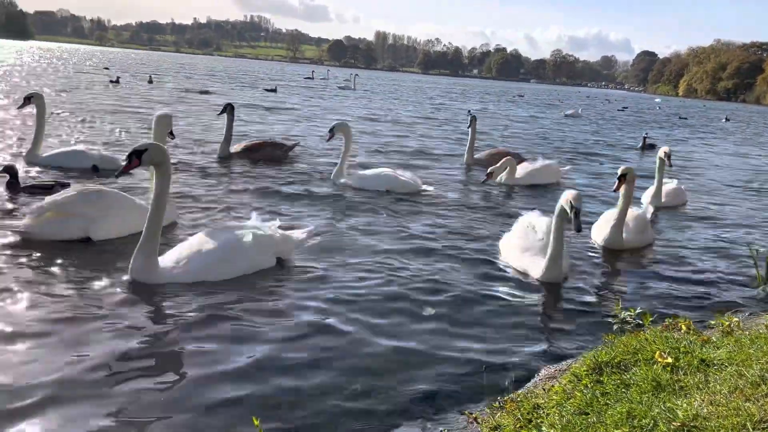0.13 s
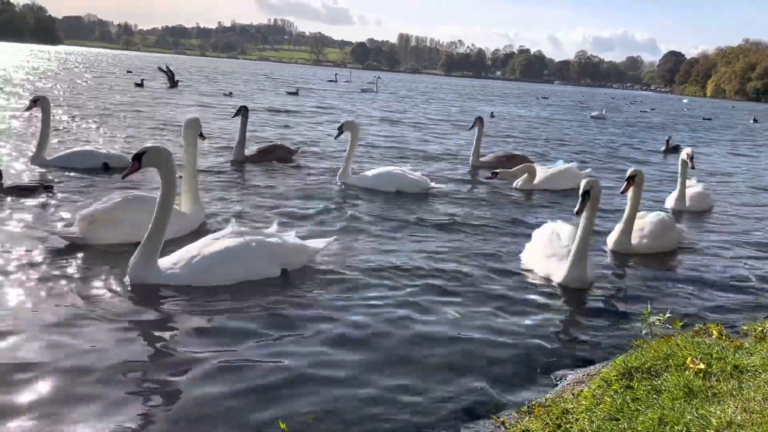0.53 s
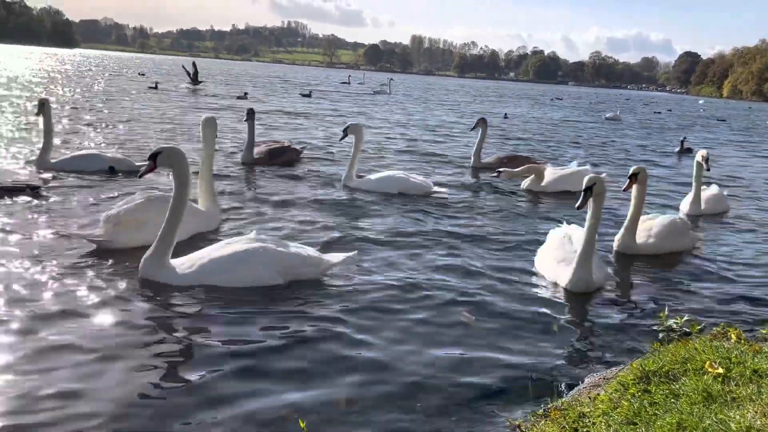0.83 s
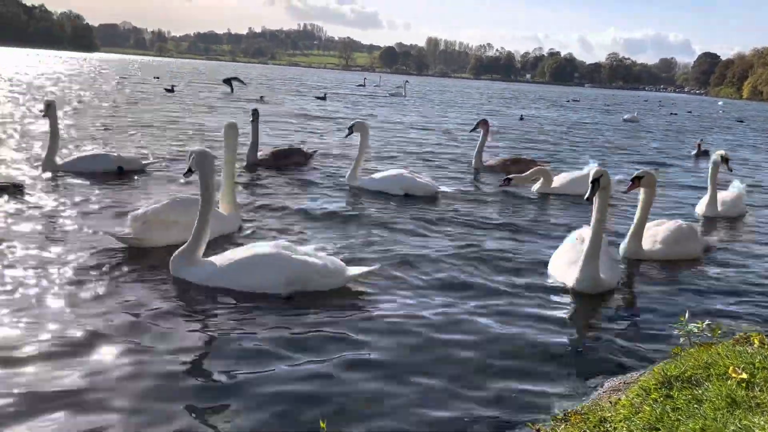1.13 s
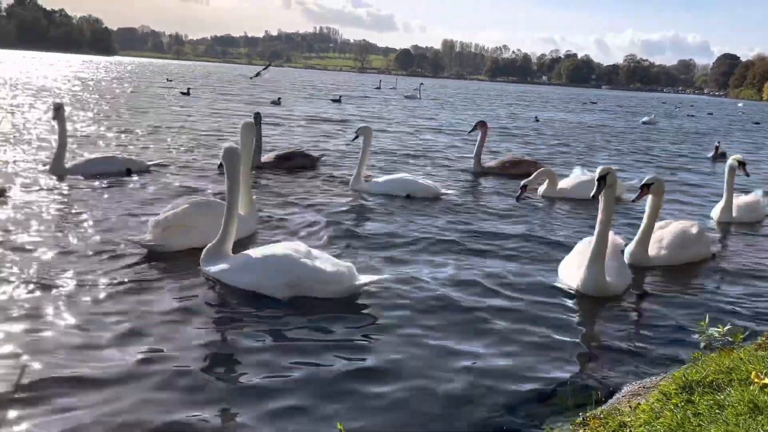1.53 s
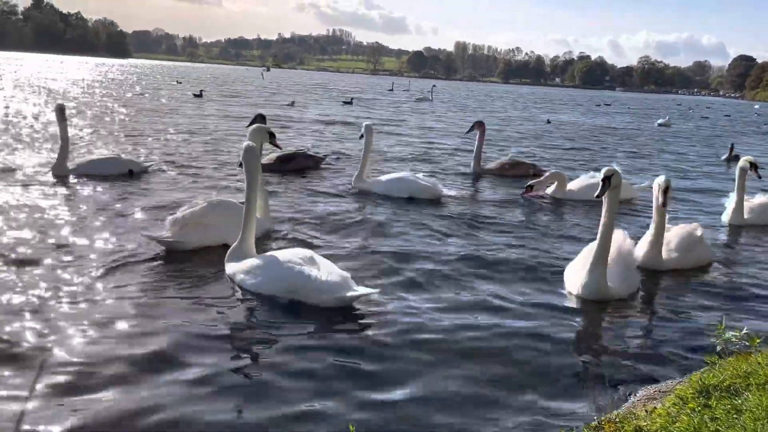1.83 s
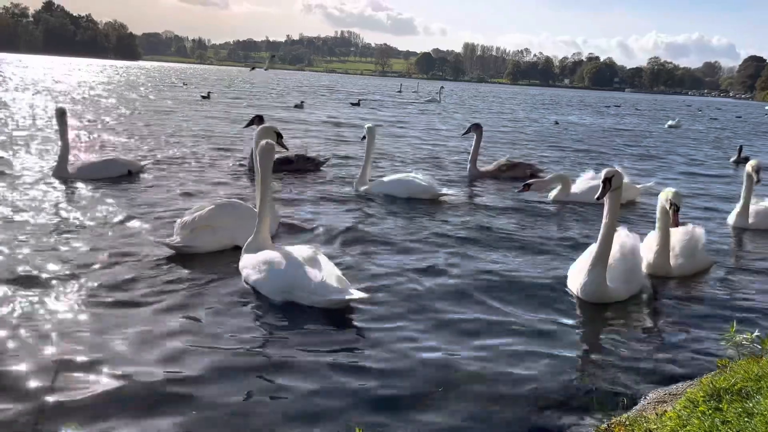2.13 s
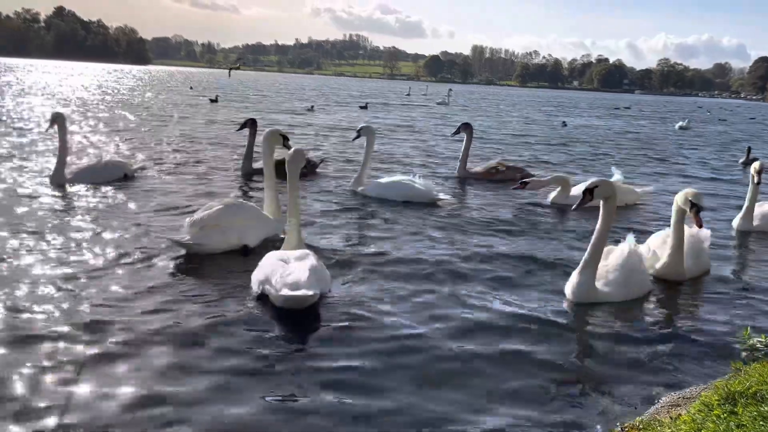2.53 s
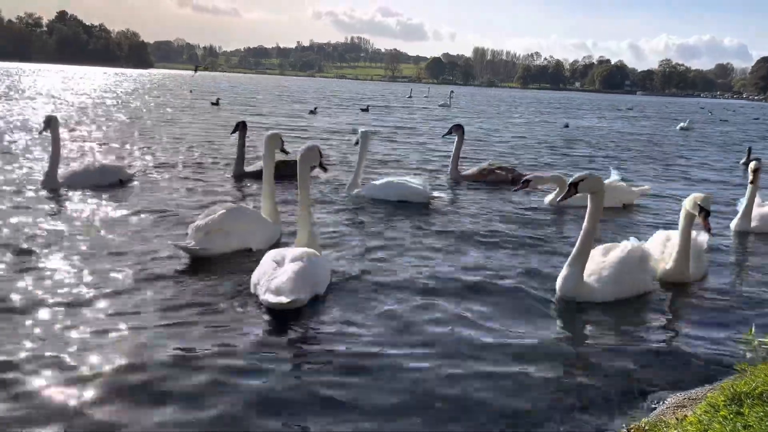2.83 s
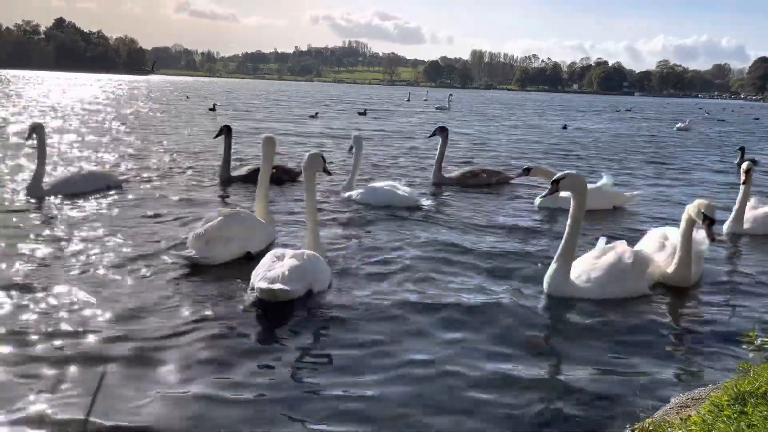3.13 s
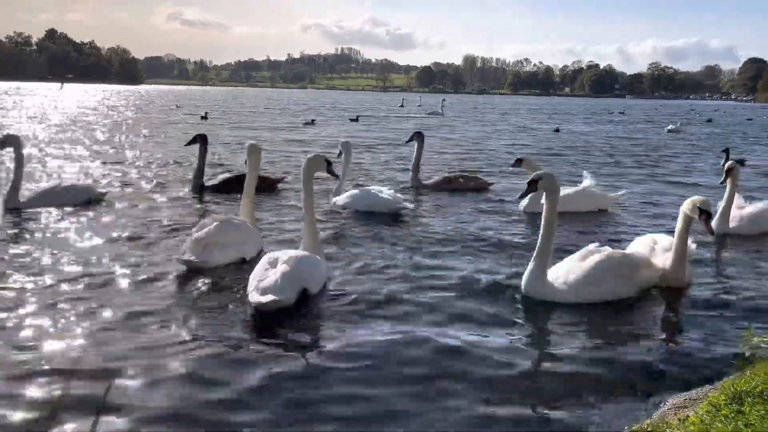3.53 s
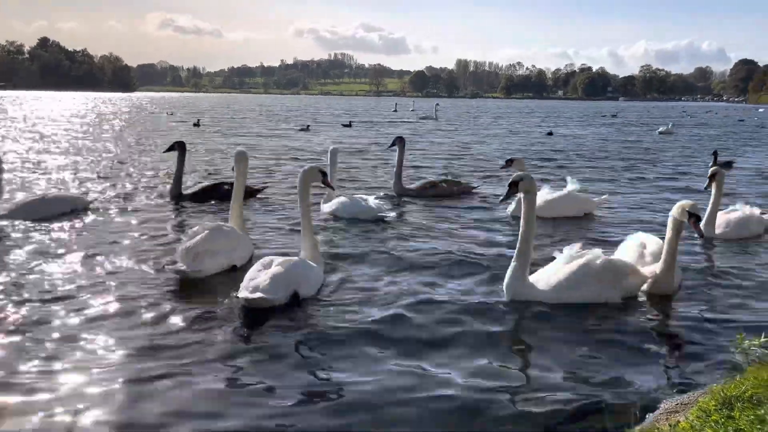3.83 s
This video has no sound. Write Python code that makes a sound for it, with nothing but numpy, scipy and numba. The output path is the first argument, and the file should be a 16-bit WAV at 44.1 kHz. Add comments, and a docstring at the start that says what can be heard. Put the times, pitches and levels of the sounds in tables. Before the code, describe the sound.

Gusty wind rumbles and thumps on the microphone over soft lake water as swans grunt briefly.

```python
"""Windy lake shore with swans

Gusts buffet the two microphone ports of a phone as rumble, flutter, crackle and single thumps of noise
and sine. The water hisses softly in flickering noise bands. Droplets tick as tiny bright grains and
bubbles plip as short tones, mostly gliding. Three swans, one near and two fainter, give creaky grunts:
slow pulses ring resonances of throat, beak and chest.
"""
import sys
import numpy as np
from scipy import signal
from scipy.fft import rfft, irfft
from scipy.io import wavfile
from scipy.ndimage import uniform_filter1d
from numba import njit

SR = 44100
rng = np.random.default_rng(int(sys.argv[2]) if len(sys.argv) > 2 else 0)


def wrap_up_sound(samples):
    """Save the sound to the file named by the first command line argument, as 16-bit audio."""
    columns = np.atleast_2d(samples).T
    # keep every value between -1 and 1, then stretch to whole-number steps
    tamed = np.clip(columns, -1, 1)
    steps = np.round(tamed * 32767).astype(np.int16)
    wavfile.write(sys.argv[1], SR, steps)


N = 176400
T = np.arange(N) / SR  # s
HZ = np.maximum(np.fft.rfftfreq(N, 1 / SR), 1)

# How the two ports hear one sound:
# (frequency [Hz], shared share of power [0-1], lead of the right [rad], left above right [dB])
PORT_PAIR = [(100, 0.2, 0.35, 0.4), (407, 1, 0.94, -0.1), (950, 0.31, 1.74, 0.5), (1545, 0.73, 3.02, -3.5),
             (1893, 0.66, 6.3, 3), (2380, 0.46, 6.5, -0.5), (3740, 0.14, 6.3, 2.5), (5000, 0.27, 8.1, 6.5),
             (6670, 0, 6.8, 4.5), (7130, 0.94, 8.2, -3.5), (8750, 1, 10.02, 2.5), (11420, 1, 11.97, -2),
             (13450, .99, 18, 1.5), (14800, 0.8, 15.7, -1)]

# Colour of the water's wash: (frequency [Hz], relative level [dB per Hz])
LAKE_COLOUR = [(25, -23), (50, -21), (150, -4.5), (350, -4.5), (600, -5.5), (800, -1.5), (1000, 1),
               (1300, -5.5), (1600, -6.5), (1800, -12.5), (2600, -15), (3850, -20), (5200, -21),
               (6500, -28.5), (9500, -32.5), (13000, -34.5), (15600, -46)]
LAKE_DB = -47
LAKE_FLICKER_DB, TREBLE_FLICKER_DB = 1.34, 1  # spread at 4 kHz and at 12 kHz

# Course of the gusts: (time [s], rumble level [dB], flutter above rumble [dB])
GUST_COURSE = [(0.0, -43, -4.5), (0.08, -35, -1.5), (0.18, -43.5, 1.5), (0.24, -29, -2),
               (0.38, -37.5, -12.5), (0.42, -40, -2.5), (0.56, -36, -9.5), (0.7, -55, 2),
               (0.76, -37.5, -1.5), (0.9, -41, -6.5), (1.09, -30, -11), (1.11, -41, -4), (1.2, -26, 3),
               (1.29, -34, -21), (1.32, -57, -3), (1.43, -26.5, -12), (1.49, -55, 6), (1.6, -36.5, -9),
               (1.63, -56.5, 3), (1.8, -38, -5), (2.36, -44, -2.5), (2.52, -32.5, -1), (2.71, -43.5, -11.5),
               (2.79, -54.5, 2), (2.85, -40.5, -5.5), (3.05, -45.5, 0), (3.08, -35, -6.5),
               (3.17, -33.5, -2.5), (3.22, -40, -6.5), (3.264, -26.5, -0.5), (3.33, -35.5, -2),
               (3.518, -34, -5), (3.646, -27, 4.5), (3.685, -28.5, -8.5), (3.72, -25.5, -1),
               (3.794, -27.5, 0), (3.832, -21, -3.5), (3.86, -29, -25), (3.892, -37.5, -8.5),
               (4.0, -32.5, -3.5)]
# Colours of the three wind layers: (frequency [Hz], relative level [dB per Hz])
RUMBLE_COLOUR = [(25, -21), (45, 10.5), (65, 14), (110, 12), (170, -2), (300, -56), (600, -94)]
FLUTTER_COLOUR = [(50, -23), (90, -7.5), (170, 1.5), (300, -4.5), (450, -12), (650, -20.5), (1000, -57),
                  (2000, -100)]
CRACKLE_COLOUR = [(250, -41), (400, 5), (550, -2), (750, -14.5), (1100, -16), (2000, -77)]
RUMBLE_ROUGH_DB, FLUTTER_ROUGH_DB, CRACKLE_ROUGH_DB = 2.0, 2.6, 3
CRACKLE_DB, CRACKLE_GROWTH = -14.5, 0.48  # above a gust of -31.5 dB; extra dB per dB of gust
CRACKLE_FOLLOWS = 0.45  # share of the flutter's dB above the rumble
WIND_ALIKE = 0.87  # share of wind power common to both ports

# Sharp single buffets, before the ports: (time [s], envelope peak level [dB])
THUMP_HITS = [(0.215, -17), (0.269, -21), (0.333, -34), (0.483, -27.5), (0.52, -20.5), (0.741, -29),
              (0.969, -26), (1.033, -28.5), (1.189, -14.5), (1.872, -27), (2.435, -23), (2.479, -23),
              (2.525, -15.5), (2.858, -28.5), (3.016, -30), (3.067, -27.5), (3.16, -19.5), (3.248, -21.5),
              (3.367, -16), (3.456, -27.5), (3.573, -18.5), (3.619, -12.5), (3.634, -5), (3.701, -18),
              (3.785, -20), (3.82, -15.5)]
THUMP_HZ, THUMP_CYCLES = 227.3, 1.45  # pitch at mid-thump; length scale
THUMP_SAG = 0.4  # share of the mid-thump pitch lost per cycle of it

# Clear droplets: (time [s], envelope peak level [dB])
CLEAR_TICKS = [(0.778, -43), (0.8869, -36), (0.9592, -45), (2.265, -42), (2.289, -39), (2.2914, -49),
               (2.3003, -37), (2.3042, -32.5), (3.5404, -37.5), (3.809, -50), (3.8671, -47), (3.911, -47),
               (3.9497, -43)]
TICK_HZ, TICK_SPREAD_HZ, TICK_CYCLES = 11200, 900, 1.1  # cycles up to the envelope peak
SPRAY_PER_S, SPRAY_DB, SPRAY_SPREAD_DB = 70, -64, 2  # quietest level; mean excess over it
SPRAY_LOW_HZ, SPRAY_HIGH_HZ, SPRAY_CYCLES = 6100, 14100, 3.4

# Bubble tones:
# (time [s], level [dB], start pitch [Hz], end over start pitch [ratio], length [ms], left above right [dB])
BUBBLE_TONES = [(.661, -49, 1500, 1.6, 16, -4), (0.692, -44, 2500, 0.97, 9.8, -4.5),
                (0.7262, -45.5, 2800, 0.95, 6.5, -16), (0.7255, -50, 2100, 1.2, 10, -6),
                (1.458, -47, 3880, 1.4, 14, 4), (1.62, -53, 878, 1, 65, 7),
                (2.305, -44.5, 2650, 1.36, 7.9, 1), (2.935, -57, 2170, 1.06, 70, 0),
                (2.66, -53.5, 2260, 0.72, 105, -5.5), (2.7179, -46, 2300, 1.15, 13, 0),
                (3.533, -46.5, 995, 1, 34, 22), (3.556, -45.5, 1146, 1.45, 18, 2),
                (3.645, -53, 3660, .93, 8, 7), (3.659, -53, 4500, 0.96, 6.2, -4),
                (3.743, -62, 3150, 0.77, 4.7, 3), (3.775, -51, 4120, 1, 8, 5),
                (3.797, -48.5, 2400, 0.96, 24, -1), (3.925, -52.5, 3080, 0.99, 8, 9.5)]

# Each swan's voice over its grunt, one table per swan:
# (time [s], level [dB], first throat resonance [Hz], second throat resonance [Hz],
#  second above first [dB], beak resonance [Hz], beak above first throat [dB])
GRUNT_VOICES = [
    [(1.3843, -38, 1035, 1885, -6, 2300, -1), (1.42, -23, 1180, 1570, -4.5, 1890, -7),
     (1.44, -26, 1160, 1490, 3, 1880, -5), (1.46, -25, 1200, 1570, 8, 2000, -6),
     (1.478, -25, 1190, 1560, 7, 2550, -7), (1.495, -27, 1220, 1560, 7, 2900, -7),
     (1.515, -26.5, 1260, 1540, -13, 2620, -5), (1.54, -37, 990, 1680, -7, 2400, -3)],
    [(2.4358, -48, 2450, 4900, -15, 1300, -10), (2.495, -35.5, 2640, 4900, -13, 1290, -8),
     (2.515, -39, 2520, 4970, -19, 1300, -6), (2.535, -29.5, 2620, 5100, -17, 1280, -8),
     (2.585, -27.5, 3040, 6100, -20, 1480, -8), (2.64, -35.5, 2980, 6040, -14, 1290, -3)],
    [(3.378, -63, 2800, 2220, -5, 4000, -19), (3.43, -42, 2850, 2250, 2, 4000, -14),
     (3.468, -45, 2850, 1900, 0, 4000, -14), (3.501, -36, 2950, 2190, -7, 4000, -8),
     (3.565, -39, 3040, 2350, -3, 3950, -13)],
]
# Pulse rate over each grunt, one table per swan: (time [s], rate [pulses per s])
GRUNT_RATES = [
    [(1.385, 50), (1.432, 57.3), (1.478, 55.5), (1.54, 43)],
    [(2.4352, 50), (2.525, 52), (2.6, 63), (2.64, 62.5)],
    [(3.378, 52.5), (3.565, 68)],
]
# Build and place of each swan: (left above right [dB], right late [ms], throat width [Hz],
#  width of two further filter passes [multiple], chest above first throat [dB], rise in a pulse [0-1])
SWAN_BODIES = [(-.5, .1, 185, 5.5, -16, .03), (0, 0.034, 430, 1.5, -16, 0.25),
               (4.5, 0.062, 450, 1.6, -21, 0.2)]
GRUNT_JITTER, GRUNT_SCATTER_DB, GRUNT_RASP = 0.002, 0.8, 0.04  # rate share; per pulse; re pulse of 1
BEAK_WIDTH_HZ, CHEST_HZ, CHEST_WIDTH_HZ = 550, 386, 150
ECHO_S, ECHO_DB = 0.16, -12  # time to fall 60 dB; energy gain of the tail

TOP_HZ = 15700


def undb(db):
    """Turn decibels into an amplitude factor."""
    return 10 ** (np.asarray(db) / 20)


def level(x, db):
    """Set the RMS level of a sound."""
    return x * undb(db) / np.sqrt(np.mean(x ** 2))


def over_hz(table):
    """Read a table's columns at every frequency, on a log frequency axis."""
    rows = np.array(table).T
    return [np.interp(np.log(HZ), np.log(rows[0]), column) for column in rows[1:]]


def over_time(table):
    """Read a table's columns at every sample."""
    rows = np.array(table).T
    return [np.interp(T, rows[0], column) for column in rows[1:]]


def walk(rate):
    """Wander randomly: levels held for 1 / rate s and smoothed twice, with a spread near 1."""
    hold = int(SR / rate)
    steps = np.repeat(rng.standard_normal(N // hold + 1), hold)
    return 1.74 * uniform_filter1d(uniform_filter1d(steps, hold), hold)[:N]


def noises(gain):
    """Make three unrelated noises of one colour."""
    return irfft(rfft(rng.standard_normal((3, N))) * gain, N)


@njit
def resonator(x, hz, width):
    """State-variable band-pass with a moving centre, gain 1 at the centre."""
    y, band, low = np.empty(len(x)), 0., 0.
    for i in range(len(x)):
        g, damping = np.tan(np.pi * hz[i] / SR), width / hz[i]
        v = (band + g * (x[i] + 1e-18 - low)) / (1 + g * (g + damping))
        band, low, y[i] = 2 * v - band, low + 2 * g * v, damping * v
    return y


def ports(shared, own=0, alike=None):
    """Bring a sound to both ports with a phase and level difference, plus a part of each port's own."""
    table_alike, lead, db = over_hz(PORT_PAIR)
    alike = np.clip(table_alike if alike is None else alike, 0, 1)
    side = np.array([[1], [-1]])  # left, right
    common = np.sqrt(alike) * rfft(shared) * np.exp(-.5j * lead * side)
    separate = np.sqrt(1 - alike) * rfft(own + np.zeros((2, N)))
    return irfft((common + separate) * undb(db * side / 2), N)


def place(x, pan_db, late_ms):
    """Pan by level, with the right channel a little late."""
    left = x * undb(pan_db / 2)
    right = np.interp(T - late_ms / 1000, T, x) * undb(-pan_db / 2)
    return np.array([left, right])


def lake():
    """Wash of small waves: overlapping noise bands, each flickering in level on its own."""
    colour, wash = undb(over_hz(LAKE_COLOUR)[0]), 0
    for centre in np.arange(5, 14.5, .5):  # log2 of Hz: half-octave steps
        band = np.cos(np.pi * np.clip(np.log2(HZ) - centre, -.5, .5))
        flicker_db = np.interp(centre, np.log2([4000, 12000]), [LAKE_FLICKER_DB, TREBLE_FLICKER_DB])
        wash = wash + noises(colour * band) * undb(flicker_db * walk(21.99))
    wash = level(wash, LAKE_DB)
    return ports(wash[0], wash[1:])


def wind_layer(colour, db):
    """Coloured noise whose level follows a moving curve."""
    return level(noises(undb(over_hz(colour)[0])), 0) * undb(db)


def thumps():
    """Sharp buffets: a brief sine of sagging pitch under a bell-shaped envelope."""
    out = np.zeros(N)
    for start, db in THUMP_HITS:
        turn = (T - start) * THUMP_HZ - THUMP_CYCLES / 2  # cycles from mid-thump
        envelope = np.exp(-(2.55 * turn / THUMP_CYCLES) ** 2)
        out += undb(db) * envelope * np.sin(2 * np.pi * (turn - THUMP_SAG * turn ** 2 / 2))
    return out


def wind():
    """Eddies press on the ports: deep rumble, rougher flutter, crackle growing with the gusts, thumps."""
    rumble_db, above_db = over_time(GUST_COURSE)
    flutter_db = rumble_db + above_db + FLUTTER_ROUGH_DB * walk(80)
    gust_db = rumble_db + CRACKLE_FOLLOWS * (flutter_db - rumble_db)
    crackle_db = gust_db + CRACKLE_DB + CRACKLE_GROWTH * (gust_db + 31.5) + CRACKLE_ROUGH_DB * walk(110)
    air = wind_layer(RUMBLE_COLOUR, rumble_db + RUMBLE_ROUGH_DB * walk(25.61))
    air += wind_layer(FLUTTER_COLOUR, flutter_db)
    air += wind_layer(CRACKLE_COLOUR, crackle_db)
    air[0] += thumps()  # row 0 reaches both ports
    return ports(air[0], air[1:], WIND_ALIKE)


def ticks():
    """Droplets land as tiny bright sine grains, a few clear ones among a fine spray of scattered pitch."""
    clear = np.array(CLEAR_TICKS)
    clear_hz = TICK_HZ + TICK_SPREAD_HZ * rng.standard_normal(len(clear))
    clear = np.c_[clear, clear_hz, np.full(len(clear), TICK_CYCLES)]

    chance = rng.random((int(SPRAY_PER_S * N / SR), 3))
    spray_s = chance[:, 0] * N / SR
    spray_db = SPRAY_DB - SPRAY_SPREAD_DB * np.log(chance[:, 1])
    spray_hz = SPRAY_LOW_HZ + (SPRAY_HIGH_HZ - SPRAY_LOW_HZ) * chance[:, 2]
    spray = np.c_[spray_s, spray_db, spray_hz, np.full(len(chance), SPRAY_CYCLES)]

    out, t = np.zeros(N + 256), T[:256]
    for start, db, hz, cycles in np.r_[clear, spray]:
        u = t * hz / cycles
        envelope = np.e * u * np.exp(-u)  # peaks at 1 when u = 1
        first = int(start * SR)
        out[first:first + 256] += undb(db) * envelope * np.sin(2 * np.pi * hz * t)
    return ports(out[:N], alike=1)


def bubbles():
    """Each bubble rings as a short tone, steady or gliding, that swells fast and fades slower."""
    out = np.zeros((2, N))
    for start, db, hz, glide, ms, pan_db in BUBBLE_TONES:
        u = np.clip((T - start) * 1000 / ms, 0, 1)  # progress through the bubble
        tone = np.sin(2 * np.pi * hz * ms / 1000 * (u + (glide - 1) * u ** 2 / 2))
        envelope = np.sin(np.pi * u ** 0.37) ** 2
        out += place(undb(db) * tone * envelope, pan_db, 0.016)
    return out


def echo(voice):
    """A fading noise tail, different left and right, smears the voice."""
    tail = rng.standard_normal((2, SR // 4)) * undb(-60 * T[:SR // 4] / ECHO_S)
    tail = level(tail, ECHO_DB) * np.sqrt(4 / SR)  # from RMS to total energy
    return signal.fftconvolve(voice[None], tail, axes=1)[:, :N]


def grunt(table, rates, swan):
    """Slow pulses with a short rasp ring two moving throat resonances, the beak and the chest."""
    pan_db, late_ms, width_hz, soften, chest_db, rise = swan
    db, first_hz, second_hz, second_db, beak_hz, beak_db = over_time(table)
    on = (T >= rates[0][0]) & (T < rates[-1][0])
    rate = over_time(rates)[0] * on * (1 + GRUNT_JITTER * walk(50))
    phase = np.cumsum(rate) / SR + on  # whole numbers mark pulses; the first comes at once
    within = phase % 1

    pulses = np.maximum(np.diff(np.floor(phase), prepend=0), 0)
    rasp = GRUNT_RASP * on * np.exp(-within / 0.22) * rng.standard_normal(N)
    scatter = undb(GRUNT_SCATTER_DB * rng.standard_normal(64))[phase.astype(int)]
    push = (pulses + rasp) * scatter * undb(db)
    opening = 1 - rise * np.exp(-within / .06)  # all resonances rise within each pulse

    def ring(hz, width):
        ringing = resonator(push, hz * opening, width)
        for _ in range(2):  # further passes round the onset
            ringing = resonator(ringing, hz * opening, soften * width)
        return ringing * SR / (np.pi * width)

    voice = ring(first_hz, width_hz) + undb(second_db) * ring(second_hz, width_hz)
    voice += undb(beak_db) * ring(beak_hz, BEAK_WIDTH_HZ)
    voice += undb(chest_db) * ring(CHEST_HZ, CHEST_WIDTH_HZ)
    return place(voice, pan_db, late_ms) + echo(voice)


def swans():
    """Three swans grunt, each with a pulse rate and body of its own."""
    return sum(grunt(*swan) for swan in zip(GRUNT_VOICES, GRUNT_RATES, SWAN_BODIES))


def scene():
    """Layer the shore from the background to the swans."""
    return lake() + wind() + ticks() + bubbles() + swans()


def record(dry):
    """The phone cuts the top with a steep low-pass."""
    low_pass = signal.ellip(12, .2, 70, TOP_HZ, fs=SR, output="sos")
    return signal.sosfilt(low_pass, dry)


dry = scene()
out = record(dry)
wrap_up_sound(out)
```